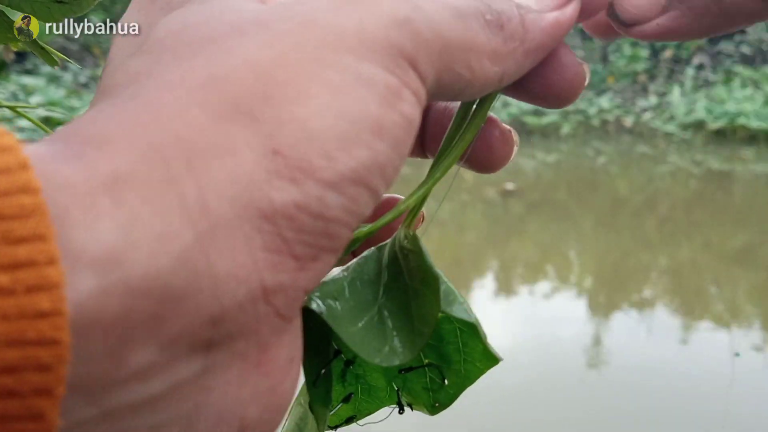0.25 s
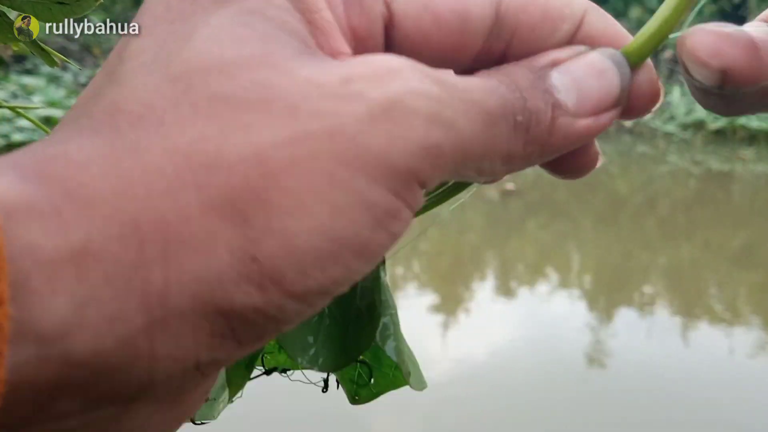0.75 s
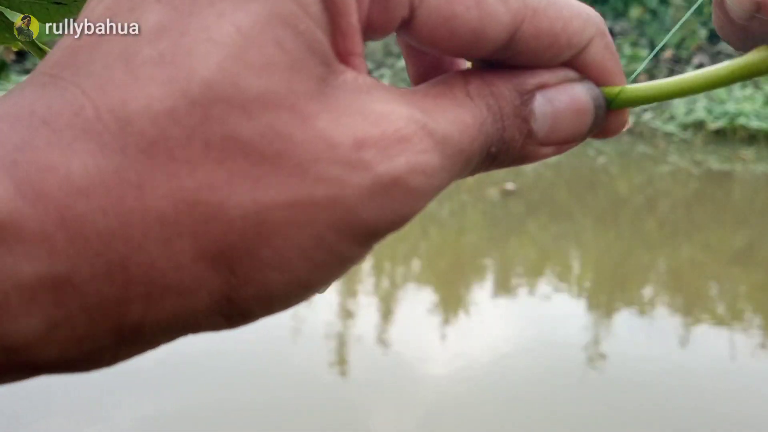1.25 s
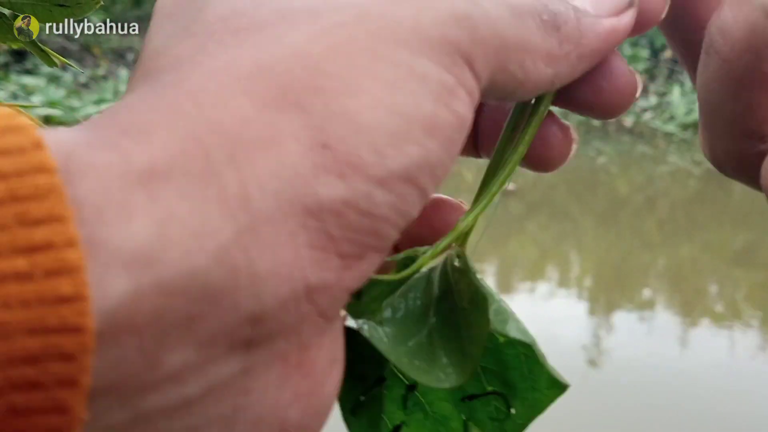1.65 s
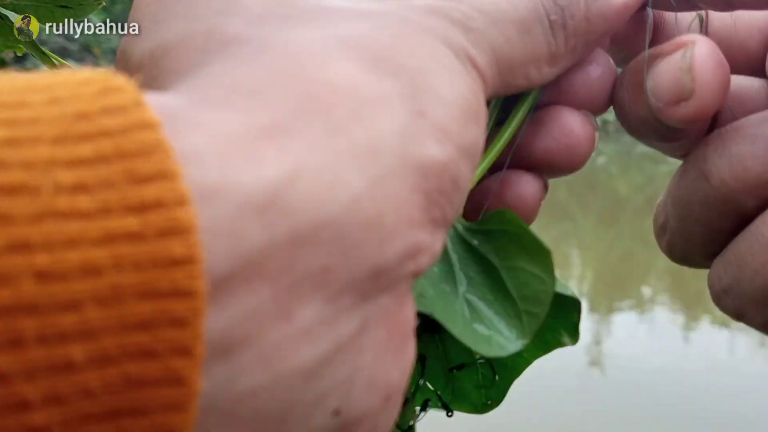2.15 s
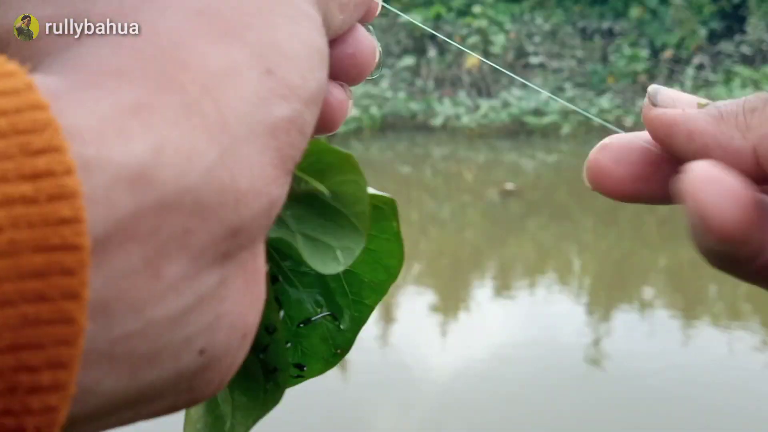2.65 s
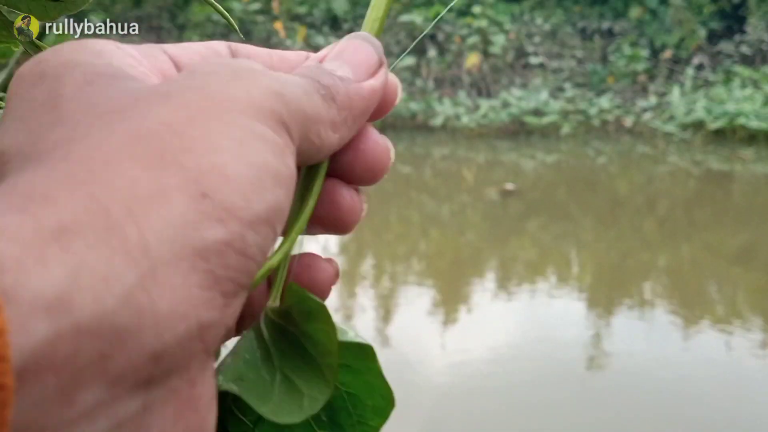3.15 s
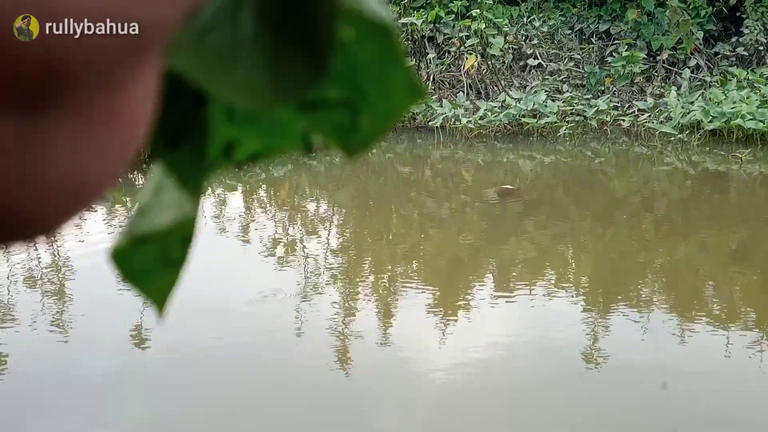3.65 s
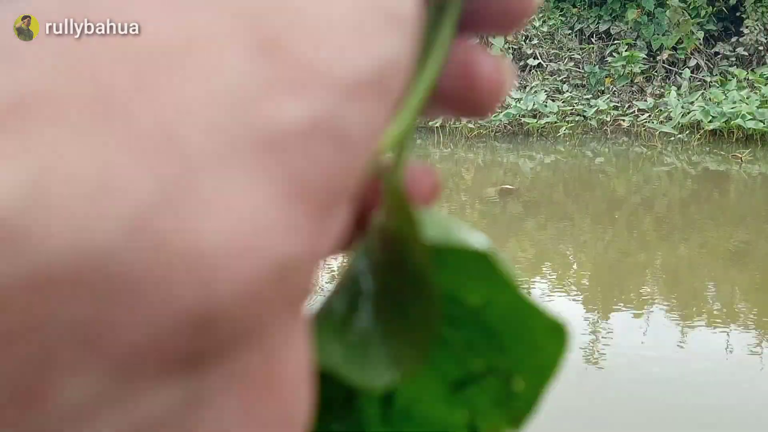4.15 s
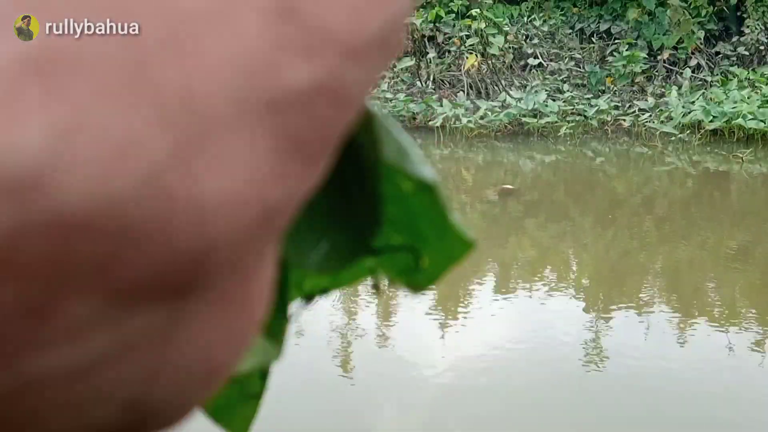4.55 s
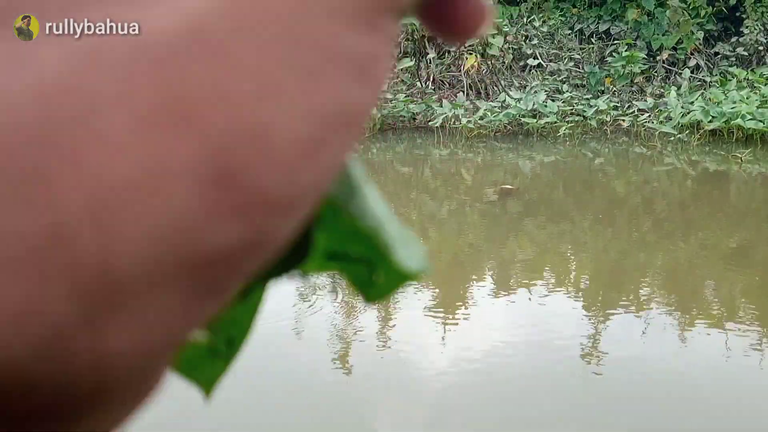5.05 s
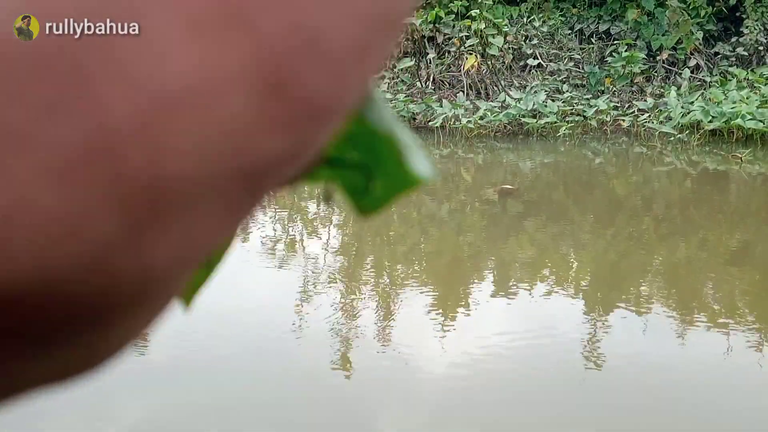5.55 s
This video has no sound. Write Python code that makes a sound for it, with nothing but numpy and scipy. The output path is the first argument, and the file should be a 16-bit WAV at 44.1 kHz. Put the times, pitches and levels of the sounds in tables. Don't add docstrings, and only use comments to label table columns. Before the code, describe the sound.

Crickets trill steadily beside a pond over a low sinking engine drone, while fingers snap a leaf stem and small birds chirp and wind thumps softly.

```python
import sys
import numpy as np
from scipy import signal
from scipy.fft import rfft, irfft, next_fast_len
from scipy.io import wavfile
from scipy.ndimage import uniform_filter1d

SR = 44100
rng = np.random.default_rng(int(sys.argv[2]) if len(sys.argv) > 2 else 0)


def invert_db(level):
    return 10 ** (np.asarray(level, dtype=float) / 20)


def transcribe(signal):
    frames = np.atleast_2d(signal).T
    limited = np.clip(frames, -1, 1)
    pcm = np.round(limited * 32767).astype(np.int16)
    wavfile.write(sys.argv[1], SR, pcm)


N = 255766
T = np.arange(N) / SR


def noise():
    return rng.standard_normal(N)


def shaped(x, points):
    hz, db = np.transpose(points)
    n = next_fast_len(N, True)
    bins_hz = np.arange(n // 2 + 1) * SR / n
    gain_db = np.interp(np.log(bins_hz + 1), np.log(hz), db, -200, -200)
    y = irfft(rfft(x, n) * invert_db(gain_db), n)[:N]
    return y / np.std(y)


def band(x, lo_hz, hi_hz):
    sos = signal.butter(3, [lo_hz, min(hi_hz, SR / 2.1)], "band", fs=SR, output="sos")
    return signal.sosfilt(sos, x)


def walk(rate):
    k = int(SR / rate)
    held = np.repeat(rng.standard_normal(N // k + 1), k)
    return 1.4 * uniform_filter1d(uniform_filter1d(held, k), k)[:N]


def curves(table):
    s, *columns = np.transpose(table)
    return [np.interp(T, s, c) for c in columns]


def between(start, end):
    return 1. * (T > start) * (T < end)


def sine(hz):
    return np.sin(2 * np.pi * np.cumsum(hz) / SR)


def decay(t, t60):
    return np.exp(-np.log(1000) * t / t60)


def add(out, s, x):
    i = max(int(s * SR), 0)
    out[i:i + len(x)] += x[:N - i]


def echoes(x, t60, wet_db, first_s=0.011):
    t = np.arange(int(.3 * SR)) / SR
    tail = rng.standard_normal(len(t)) ** 3 * decay(t, t60) * (t > first_s)
    return x + invert_db(wet_db) * signal.fftconvolve(x, tail / np.linalg.norm(tail))[:N]


# frequency in Hz, level in dB per Hz.
AIR_COLOUR = [(12, -67), (20, -39), (59, -17.5), (122, -1.5), (148, -7), (176, -8), (235, -20),
              (353, -30.5), (508, -34.5), (1130, -40.5), (5950, -48), (6400, -51), (8320, -82),
              (14100, -120)]
# frequency in Hz, level in dB per Hz.
TOP_COLOUR = [(10800, -15), (11300, -6), (12300, -4), (13100, -7), (13650, -7), (14200, -7), (15000, 5),
              (15530, 7)]


def air():
    octaves_hz = 14 * 2 ** np.arange(10)
    patches = sum(invert_db(1.2 * walk(12)) * band(noise(), hz, 2 * hz) for hz in octaves_hz)
    hiss = shaped(patches, AIR_COLOUR)
    hiss *= invert_db(-63) / np.std(band(hiss, 447, 5700))
    shimmer = invert_db(-75.5 + 1.2 * walk(13)) * shaped(noise(), TOP_COLOUR)
    return hiss + shimmer


# time in seconds, firing rate in Hz, drone level in
# dB, # sixth order in dB against the drone, nearness of the second vehicle from 0 to 1 that lets its roar
ENGINE_RUN = [(0.0, 31.0, -32.5, -7.5, 0.03), (.4, 30.75, -33, -10.5, 0.2), (.8, 30.47, -33.5, -8.5, 0.14),
              (1.3, 30.1, -37, -9.5, 0), (1.55, 29.9, -34.5, -5.5, 0), (1.8, 29.7, -40.5, -5, 0),
              (2.1, 29.4, -38, -6, 0), (2.3, 29.28, -35.5, -6, 0.72), (2.65, 29.3, -36.5, -3.5, 0.6),
              (3.0, 29.05, -38, -6, 0.89), (3.33, 28.85, -39.5, 0.5, 1.01), (3.52, 28.7, -36, -5.5, 0.63),
              (3.8, 28.62, -35, -2, 0.95), (4.3, 28.3, -39, -2.5, 1.06), (4.55, 28.1, -35, -4.5, 0.99),
              (4.85, 27.95, -36, -1, 0.72), (5.25, 27.6, -37, -1, 0.95), (5.8, 27.2, -38, 1, 0.42)]
# frequency in Hz, level in dB per Hz.
ROAR_COLOURS = [
    [(150, -12), (195, 1), (265, -7), (300, -27.5)],
    [(240, -13.5), (280, 2.5), (340, -4), (400, -14), (480, -42)],
]
# multiple of the firing rate, level in dB against the roar.
WEAK_ORDERS = [(7, -8), (8, -10), (9, -19.5), (10, -11.5), (11, -14.5)]


def engine():
    hz, drone_db, sixth_db, near = curves(ENGINE_RUN)
    turns = np.cumsum(hz) / SR
    roar_db = -55 + 8 * near
    upper_db = -67 + 17 * near
    throb_db = 3.0 * walk(10) + 0.51 * np.sin(2 * np.pi * turns)
    out = np.zeros(N)
    for db, colour in zip((roar_db, upper_db), ROAR_COLOURS):
        out += invert_db(db + throb_db) * shaped(noise(), colour)

    fourth_db = -13.5 + 1.3 * (hz[0] - hz)
    fourth_db = fourth_db + 4.5 * walk(2.5)
    orders = [(5, drone_db), (6, drone_db + sixth_db), (4, drone_db + fourth_db)]
    orders += [(k, (roar_db if k < 9.5 else upper_db) + db) for k, db in WEAK_ORDERS]
    for k, db in orders:
        tremble_db = 5.0 if k > 6 else 1.5
        phase = 2 * np.pi * k * turns + 0.033 * k * walk(6) + 6 * rng.random()
        out += np.sqrt(2) * invert_db(db + tremble_db * walk(9)) * np.sin(phase)
    return out


# time in seconds, level in dB.
GUST = [(0.0, -63), (0.73, -39.5), (1.16, -54), (1.84, -57), (2.2, -71), (2.58, -43), (3.39, -65),
        (4.17, -41), (4.75, -45.5), (5.3, -45), (5.8, -62)]
# middle in seconds, peak in dB.
PUFFS = [(0.058, -32), (0.543, -36), (0.641, -32), (0.689, -35), (0.757, -28), (0.846, -32), (0.948, -35),
         (1.315, -25), (1.43, -27), (1.499, -32), (1.99, -39), (1.774, -30), (2.432, -20.5), (2.642, -33),
         (2.979, -26.5), (3.092, -20), (3.144, -28), (3.656, -29), (3.848, -31), (3.994, -42),
         (4.056, -14.5), (4.126, -24.5), (4.239, -36), (4.355, -20.5), (4.469, -28.5), (4.522, -22),
         (4.987, -28), (5.076, -21.5), (5.61, -31)]


def wind():
    eddies = shaped(noise(), [(18, -45), (40, 2.5), (75, 6), (115, 8), (160, -27)])
    out = invert_db(curves(GUST)[0] + 3.2 * walk(14)) * eddies
    t = np.arange(-1200, 1200) / SR
    puff_hz = 80.6
    push = -np.cos(2 * np.pi * puff_hz * t) * np.exp(-(t * puff_hz / 0.57) ** 2)
    for s, db in PUFFS:
        add(out, s + t[0], invert_db(db) * push)
    return out


def note(length, start_hz, end_hz, swoop_hz):
    u = np.linspace(-.4, 1.4, int(1.8 * length * SR))
    hz = start_hz + (end_hz - start_hz) * u + swoop_hz * np.exp(-(u + 0.37) / 0.22)
    waver_hz = uniform_filter1d(rng.standard_normal(len(u)), size=90) * 800
    return np.hanning(len(u)) * sine(hz + waver_hz)


def twitter(out):
    for when, long, high, glide, loud in rng.random((110, 5)):
        hz = 500 * 8 ** (high ** 2)
        db = -67 + 7 * loud - 7 * high
        add(out, when * N / SR, invert_db(db) * note(.015 + .04 * long, hz, hz * (.96 + .08 * glide), 0))


# time in seconds, pitch in Hz, level in dB.
UPSWEEPS = [
    [(1.34, 3700, -76), (1.36, 4140, -45), (1.384, 4500, -48), (1.414, 5030, -50), (1.436, 5060, -58),
     (1.447, 4996, -69)],
    [(2.145, 3394, -74), (2.157, 3430, -71), (2.193, 4210, -41), (2.219, 4470, -49), (2.247, 5020, -47.5),
     (2.265, 5040, -54), (2.275, 5402, -49), (2.321, 5450, -69), (2.326, 5399, -71)],
]
# time in seconds, pitch in Hz, level in dB.
PIPES = [
    [(4.415, 2800, -68), (4.43, 2760, -56.5), (4.5, 2770, -66), (4.54, 2800, -76)],
    [(4.545, 2350, -84), (4.557, 2380, -54.5), (4.6, 2520, -58), (4.618, 3000, -67), (4.635, 2681, -56),
     (4.665, 2540, -55), (4.72, 2480, -81)],
]


def whistles():
    out = np.zeros(N)
    for call in list(UPSWEEPS) + list(PIPES):
        hz, db = curves(call)
        gate = uniform_filter1d(between(call[0][0], call[-1][0]), size=300)
        flutter_db = 2.5 * walk(130)
        out += np.sqrt(2) * gate * invert_db(db + flutter_db) * sine(hz * (1 + .005 * walk(90)))
    return out


# lag in seconds, length in seconds, start in Hz, end in Hz, swoop from above in Hz.
FIGURE = [
    (.003, .013, 4300, 4270, -60),
    (0.013, .014, 4770, 4660, 650),
    (0.065, .014, 5470, 5230, 77),
]
# time in seconds, then peaks of the low, middle and high note in dB.
TRILL = [
    (4.021, -43.5, -45, -45),
    (4.138, -57, -45, -41),
    (4.259, -47.5, -46, -44.5),
    (4.385, -48, -47.5, -44),
    (4.506, -44, -46, -48.5),
    (4.628, -45.5, -52, -55),
    (4.756, -52, -52, -72),
]
# time just after the onset in seconds, length in seconds, start in Hz, end in Hz,
# peak in dB.
DROOPS = [
    (3.499, 0.012, 6150, 6100, -46),
    (3.817, 0.013, 4790, 4600, -45),
    (3.839, .02, 4500, 4230, -58),
    (3.895, .022, 5420, 5230, -36.5),
    (3.973, 0.012, 5680, 5340, -42.5),
]
# middle in seconds, length in seconds, pitch in Hz, peak in dB.
PEEPS = [(1.16, .05, 330, -52), (1.77, .06, 350, -50), (1.96, .06, 290, -47), (2.27, .06, 300, -47),
         (2.145, .06, 990, -63), (2.08, .04, 1390, -63), (.39, .06, 705, -61), (1.204, .018, 3400, -59.5),
         (1.21, .06, 1800, -62), (1.462, .022, 5440, -59), (1.49, .07, 4800, -65), (1.53, .05, 5250, -63),
         (1.55, .05, 3700, -61), (1.865, .012, 2520, -59), (2.31, .03, 3050, -63), (2.283, .006, 2400, -60),
         (2.932, .045, 2215, -62), (3.025, .045, 2150, -60), (3.07, .04, 1420, -63), (3.2, .06, 1370, -63),
         (3.73, .035, 4100, -67), (3.88, .06, 4150, -64), (3.322, .014, 5400, -59), (4.72, .014, 5300, -58),
         (4.135, .03, 4190, -57), (4.045, .02, 3950, -56), (4.17, .04, 5050, -58), (4.29, .03, 4200, -57),
         (4.35, .09, 5950, -68), (4.44, .03, 5900, -63), (3.885, .03, 5750, -57), (1.45, .05, 4150, -67),
         (1.56, .035, 5280, -62), (1.563, .02, 5600, -62), (4.34, .035, 2620, -65), (4.371, .01, 4010, -56),
         (4.39, .03, 2850, -68), (1.535, .03, 5580, -62), (4.489, .014, 4150, -57),
         (4.676, .033, 1670, -62.5), (4.808, .009, 5300, -59), (4.84, .035, 5270, -61),
         (5.08, .04, 5430, -65), (5.113, .009, 5415, -61), (5.15, .04, 5380, -65)]
# time just after the onset in seconds, length in seconds, start in Hz, peak in
# dB.
CHIPS = [(2.646, 0.0098, 6300, -45), (2.96, 0.0077, 6200, -48), (2.965, .007, 5430, -39.5),
         (3.116, 0.0063, 6400, -35), (3.284, .004, 5700, -59), (3.3, .005, 6400, -52),
         (3.302, .005, 5540, -56), (3.491, .004, 5900, -56), (3.506, 0.0047, 6160, -47),
         (3.511, 0.0054, 5200, -60), (3.597, .006, 7600, -40), (3.607, 0.0059, 6500, -43),
         (3.67, .004, 5900, -50), (3.678, 0.0055, 6700, -44), (3.685, 0.0041, 6000, -40.5),
         (3.703, .004, 5900, -49), (3.752, 0.006, 6170, -40.5)]
# delay in seconds, level in dB.
BANK_SLAPS = [
    (.023, -13),
    (.044, -18),
]


def birds():
    notes = []
    for s, *peaks_db in TRILL:
        for (lag, *shape), db in zip(FIGURE, peaks_db):
            notes.append((s + lag, *shape, db))
    for s, length, start_hz, end_hz, db in DROOPS:
        notes.append((s, length, start_hz, end_hz, 0, db))
    for s, length, hz, db in PEEPS:
        swoop_hz = 0.03 * hz * (length < .03) * (hz > 4500)
        notes.append((s - .38 * length, length, hz, hz * (1 - 0.022), swoop_hz, db))

    song, chips = np.zeros((2, N))
    for s, length, start_hz, end_hz, swoop_hz, db in notes:
        add(song, s - 0.52 * length, invert_db(db) * note(length, start_hz, end_hz, swoop_hz))
    for s, length, hz, db in CHIPS:
        add(chips, s - 0.46 * length, invert_db(db) * note(length, hz, hz - 900, 0))
    twitter(song)

    near = echoes(song, .07, -11, first_s=.003) + echoes(chips, .14, -6, first_s=.003)
    near = near + sum(invert_db(db) * np.roll(near, int(s * SR)) for s, db in BANK_SLAPS)
    piped = echoes(whistles(), .06, -10, first_s=.004)
    return echoes(near, .4, -17) + echoes(piped, .3, -15)


def crack(t60, lo_hz, hi_hz):
    t = np.arange(1500) / SR
    push = rng.standard_normal(len(t)) * decay(t, t60)
    push[0] = 8.0
    x = signal.sosfilt(signal.butter(2, [lo_hz, hi_hz], "band", fs=SR, output="sos"), push)
    return x / np.abs(x).max()


def ring(hz, t60):
    t = np.arange(3000) / SR
    rise = 1 - np.exp(-t / 0.00014)
    return rise * decay(t, t60) * np.sin(2 * np.pi * hz * t)


# start in seconds, length in seconds, low band in dB, high band in dB.
RUBS = [(2.455, 0.082, -64, -80), (2.553, 0.15, -53, -50), (2.606, 0.012, -51, -32.5),
        (2.63, 0.032, -62, -51), (2.945, 0.13, -70, -45), (0.795, 0.057, -54, -79),
        (1.718, 0.055, -69, -70), (3.602, 0.14, -64.5, -59), (4.004, 0.25, -70, -64),
        (4.28, 0.11, -70, -59), (5.786, 0.078, -34, -49)]


def rubbing():
    grains = noise() * invert_db(2.2 * rng.exponential(size=N))
    low = shaped(grains, [(900, 3.0), (1600, 13.5), (6000, 7.0), (8000, -24)])
    high = shaped(grains, [(8000, 15), (11500, 7), (13500, -30), (15000, 0), (15600, -16)])
    out = np.zeros(N)
    for s, length, low_db, high_db in RUBS:
        stroke = np.sin(np.pi * np.clip((T - s) / length, 0, 1)) ** 2
        out += stroke * (invert_db(low_db) * low + invert_db(high_db) * high)
    return out


# time in seconds, thread in dB, thread shrillness in dB, stem in dB, leaf in dB.
SNAPS = [
    (0.8136, -69, -6, -32, -42),
    (2.3401, -44, -9, -51, -68),
    (2.6088, -29, -5, -35, -47),
    (2.6115, -33, -10, -38, -48),
    (2.6324, -41, 0, -58, -49),
    (2.6405, -46, 7, -40.5, -45),
    (2.8858, -52, -8, -59, -67),
    (2.9684, -38, 2, -58, -66),
    (2.9933, -26, -11, -50, -47),
    (3.038, -41, 4, -50, -56),
]
# start in seconds, pitch in Hz, peak in dB, 60 dB decay in seconds.
RINGS = [(.8143, 2070, -44, .008), (0.8136, 3280, -40, .02), (.8143, 4530, -46, .02),
         (.8143, 4900, -35, .015), (2.3405, 2680, -46.5, 0.024), (2.3405, 5900, -49, .04),
         (2.3405, 6370, -50, .03), (2.6091, 1870, -27, 0.02), (2.6091, 2230, -28, .022),
         (2.609, 620, -45, .02), (2.609, 1050, -42, .02), (2.6125, 1900, -34, .015),
         (2.6088, 2920, -37, 0.023), (2.6088, 4860, -37, .03), (2.6088, 5470, -40, .025),
         (2.6088, 6570, -42, .03), (2.611, 1600, -42, .03), (2.612, 3340, -42, .03),
         (2.612, 3960, -38, .03), (2.6328, 2300, -47, .008), (2.6328, 3700, -48, .006),
         (2.641, 4300, -48, .008), (2.641, 1700, -48, 0.023), (2.641, 2800, -43, .015),
         (2.8862, 1480, -53, 0.015), (2.8865, 4700, -55, .012), (2.8862, 6000, -50, .012),
         (2.968, 1730, -46, 0.023), (2.979, 1790, -52, .04), (2.993, 1500, -47, 0.055),
         (2.9934, 1950, -44, 0.055), (2.9938, 4680, -35, .012), (2.9938, 5720, -40, .025),
         (2.9938, 6360, -39, .025), (2.9938, 12700, -34, 0.0044), (2.9682, 12600, -42, .004),
         (2.6092, 12500, -40, .005), (3.038, 1500, -50, .012), (3.0385, 3700, -46, .012),
         (3.0385, 6000, -35, 0.015)]
# time in seconds, peak in dB.
TICKS = [(1.7431, -43), (2.2812, -58), (2.5775, -51), (3.1537, -47), (3.3837, -54), (3.6351, -52),
         (3.7344, -49), (4.0118, -58), (4.0851, -60), (4.3725, -46)]


def fingers():
    out = rubbing()
    t60 = 0.0083
    for s, thread_db, shrill_db, stem_db, leaf_db in SNAPS:
        top = invert_db(thread_db + shrill_db + 3.0) * crack(t60, 14200, 15400)
        thread = invert_db(thread_db + 6.0) * crack(t60, 9000, 13200)
        stem = invert_db(stem_db + 6.0) * crack(1.2 * t60, 1770, 3930)
        leaf = invert_db(leaf_db + 6.5) * crack(t60, 4500, 5000)
        add(out, s + 0.00063, top + thread + stem + leaf)
    for s, hz, db, ring_t60 in RINGS:
        add(out, s, invert_db(db) * ring(hz, ring_t60))
    for s, db in TICKS:
        add(out, s, invert_db(db) * (crack(0.0076, 10500, 10700) + crack(0.0065, 14000, 15000)))
    return out


def cricket(hz, drift_hz, rate, sharp, throb_db, weak_db=0):
    strokes = np.cumsum(rate * (1 + 0.0095 * walk(3.26))) / SR + rng.random()
    gate = np.abs(np.sin(np.pi * strokes)) ** (2 * sharp)
    gate = gate * invert_db(weak_db * (strokes % 2 > 1))
    throb = invert_db(throb_db * np.sin(2 * np.pi * 8.8 * T + 2 * walk(0.77)) + 1.5 * walk(5.11))
    return gate * throb * sine(hz + drift_hz * walk(2) + 50 * walk(rate))


# start in seconds, length in seconds.
LOW_PAUSES = [
    (3.306, 0.16),
    (4.14, 0.12),
    (5.12, 0.068),
]
# time in seconds, level in dB.
MID_SWELL = [(0, -51.5), (1.3, -47.5), (3.2, -48.5), (4.0, -53), (5.8, -58)]
# end in seconds, peak in dB.
HIGH_BOUTS = [(.42, -63), (1.3, -62), (2.05, -58), (2.858, -53), (3.66, -56), (4.5, -56.5), (5.399, -58)]


def kind_levels():
    pauses = sum(between(s, s + length) for s, length in LOW_PAUSES)
    low_db = -54.5 - 14 * uniform_filter1d(pauses, size=2000)
    swell_db_per_s, fall_db_per_s, rest_db = 42.5, 151.5, -75.5
    bouts = []
    for end, db in HIGH_BOUTS:
        bouts.append(db - np.where(T < end, swell_db_per_s * (end - T), fall_db_per_s * (T - end)))
    high_db = np.maximum(np.max(bouts, axis=0), rest_db)
    high_hz = 10550 + 27.5 * (high_db - rest_db)
    return low_db, curves(MID_SWELL)[0], high_db, high_hz


# frequency in Hz, level in dB per Hz.
CHORUS_COLOUR = [(6300, -36.5), (6700, -13.5), (7100, -14.5), (7350, -14.5), (7500, -5), (7750, -1),
                 (8300, 1), (8550, -8), (8800, -2.5), (9600, -9), (9900, -15.5), (10900, -22),
                 (11300, -34.5), (12000, -42)]
# time in seconds, level in dB.
CHORUS_SWELL = [(0.0, -45.5), (.5, -46.5), (1.35, -44.5), (2.2, -46), (3.1, -45), (3.8, -46), (4.67, -46.5),
                (5.36, -44), (5.8, -47.5)]
# wing pitch in Hz or 0 if it slides, pitch spread in Hz, strokes per second,
# stroke sharpness, throb in dB, level in dB.
KINDS = [
    (6932, 34, 59.3, 0.74, 1.5, 0),
    (9370, 220, 125, 0.68, 2.5, -2),
    (0, 180, 96, 1.4, 2.5, -2),
]
# start in seconds, end in seconds, pitch in Hz, level in dB.
BOUTS = [(-.1, 0.07, 8520, -39.5), (1.36, 1.97, 8430, -44.5), (2.898, 3.1, 8260, -48),
         (3.423, 3.734, 8500, -43), (5.065, 5.52, 8390, -41.5), (0.034, .3, 10500, -68),
         (1.08, 1.45, 10650, -62), (3.304, 3.622, 10550, -57.5), (3.85, 4.05, 10800, -65),
         (4.877, 5.36, 10700, -60.5)]


def crickets():
    crowd = np.zeros(N)
    for hz in range(6000, 12500, 500):
        patchy_db = (1 + (hz > 9800)) * (walk(3) + 1.5 * walk(14))
        crowd += invert_db(patchy_db) * band(noise(), hz, hz + 500)
    out = invert_db(curves(CHORUS_SWELL)[0] + 2.0) * shaped(crowd, CHORUS_COLOUR)

    *swells, slide_hz = kind_levels()
    for swell_db, (hz, spread_hz, *stroke, db) in zip(swells, KINDS):
        hz = hz if hz else slide_hz
        kind = np.zeros(N)
        for k in (-1, 0, 1):
            kind += invert_db(-3.0 * abs(k)) * cricket(hz + k * spread_hz, .3 * spread_hz, *stroke)
        out += invert_db(swell_db + db) * kind / np.std(kind)

    for s, end, hz, db in BOUTS:
        singing = uniform_filter1d(between(s, end), size=1500)
        out += 2 * invert_db(db) * singing * cricket(hz, 15, 208.5, 1.0, 0, weak_db=-7.5)
    return echoes(out, 0.62, -11.0)


def scene():
    return (air() + engine() + wind() + birds() + fingers() + crickets())[None]


def low_pass(x):
    return signal.sosfilt(signal.butter(12, 16650, fs=SR, output="sos"), x)


def record(dry):
    thin = signal.sosfiltfilt(signal.butter(1, 48, "high", fs=SR, output="sos"), dry)
    cut = signal.sosfilt(signal.ellip(8, .2, 50, 15480, fs=SR, output="sos"), thin)
    return low_pass(cut)


dry = scene()
out = record(dry)
transcribe(out)
```